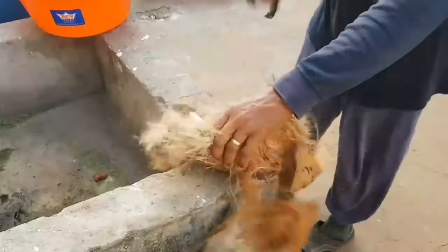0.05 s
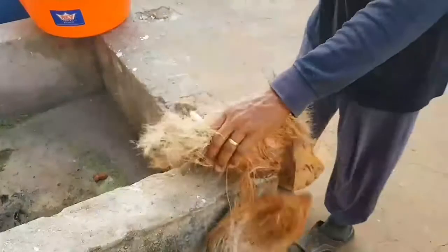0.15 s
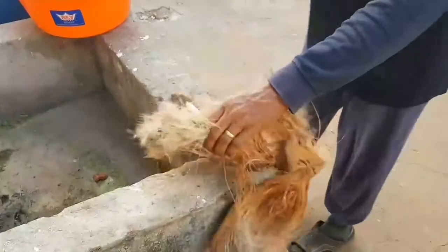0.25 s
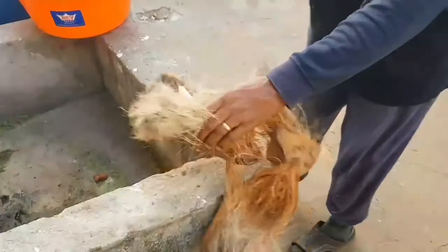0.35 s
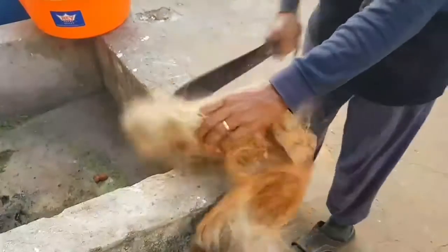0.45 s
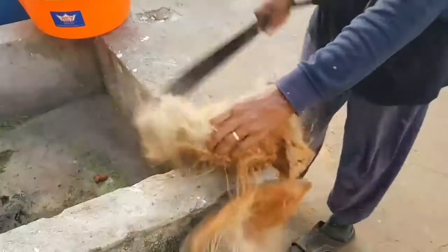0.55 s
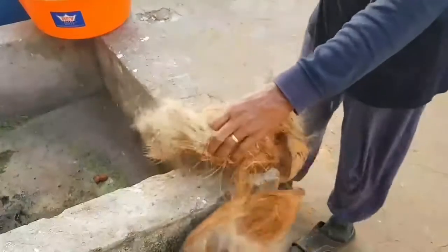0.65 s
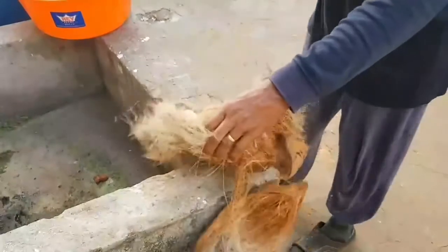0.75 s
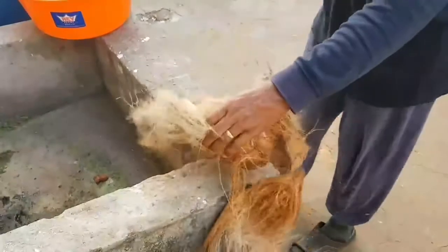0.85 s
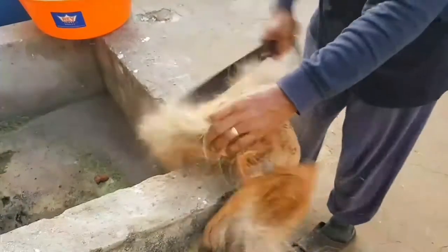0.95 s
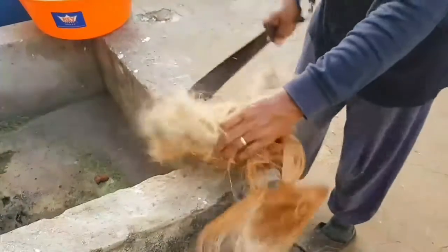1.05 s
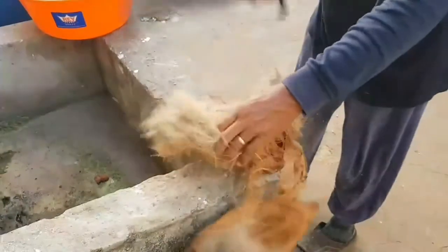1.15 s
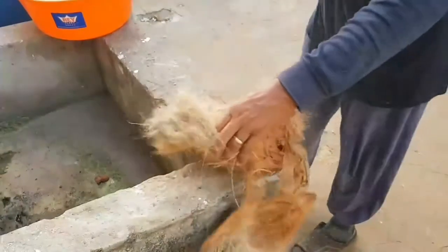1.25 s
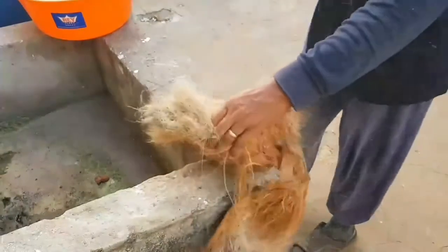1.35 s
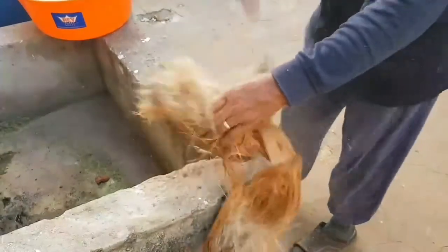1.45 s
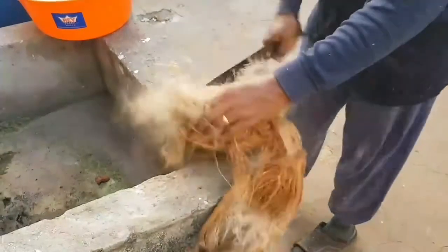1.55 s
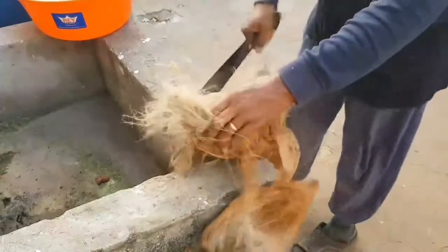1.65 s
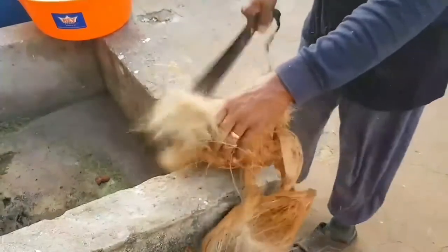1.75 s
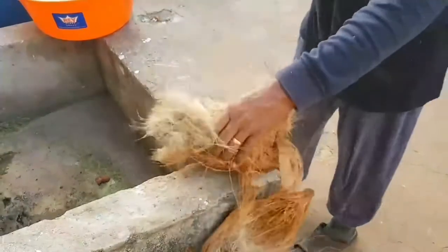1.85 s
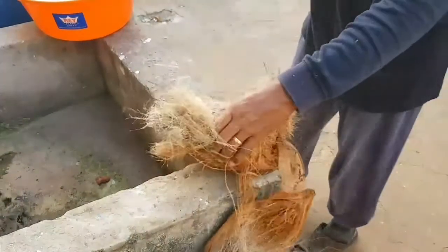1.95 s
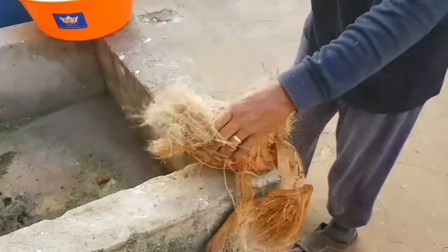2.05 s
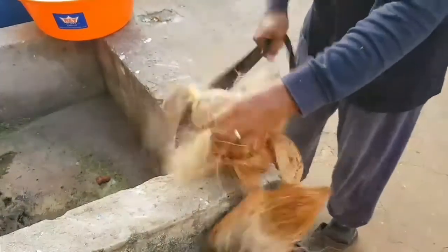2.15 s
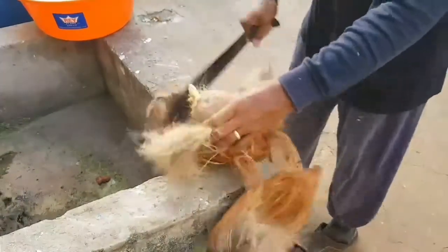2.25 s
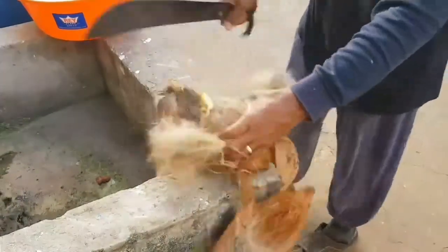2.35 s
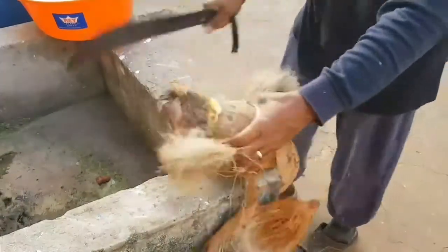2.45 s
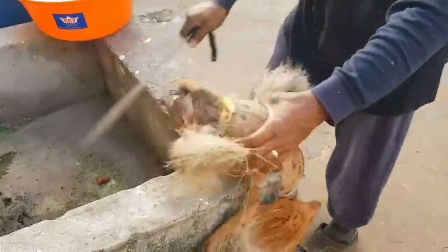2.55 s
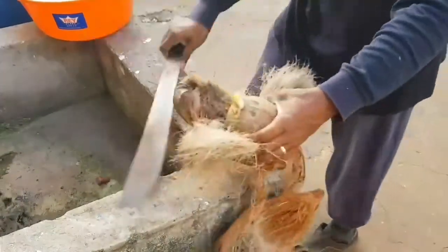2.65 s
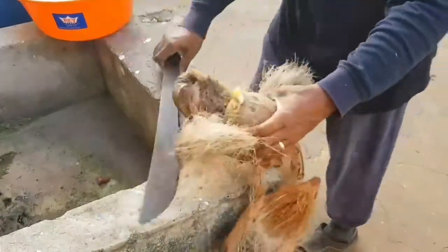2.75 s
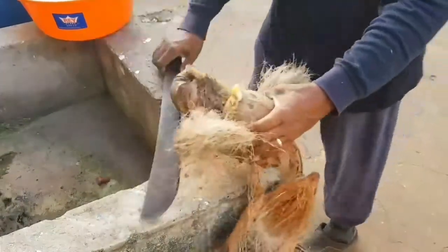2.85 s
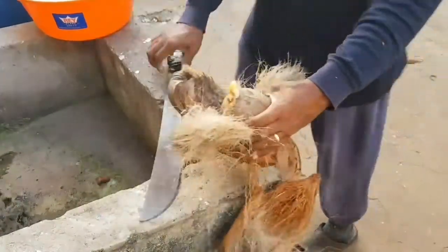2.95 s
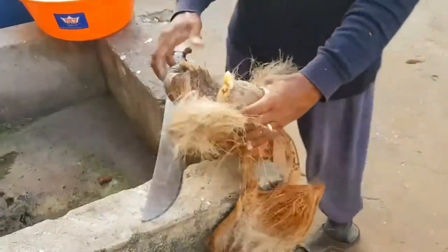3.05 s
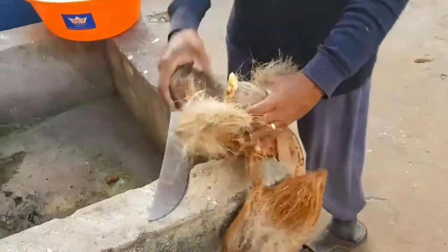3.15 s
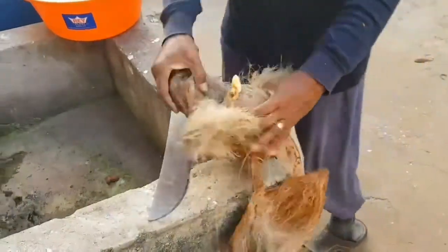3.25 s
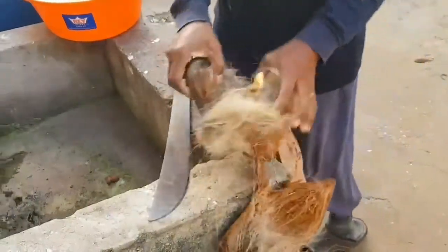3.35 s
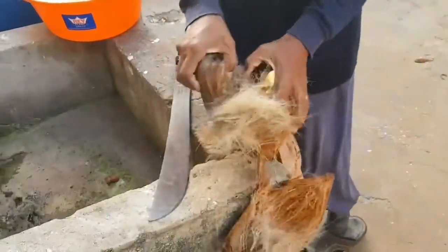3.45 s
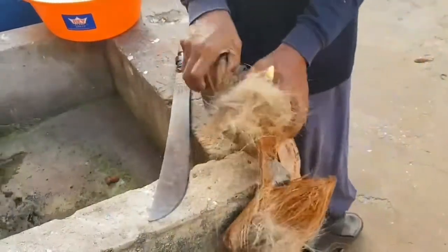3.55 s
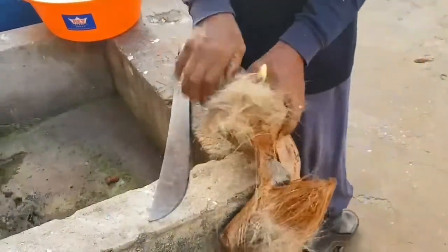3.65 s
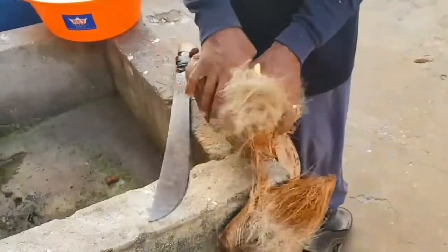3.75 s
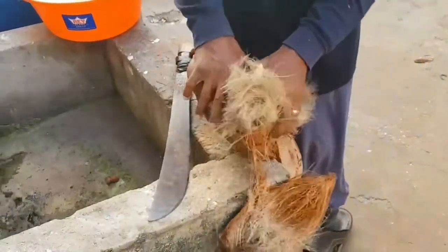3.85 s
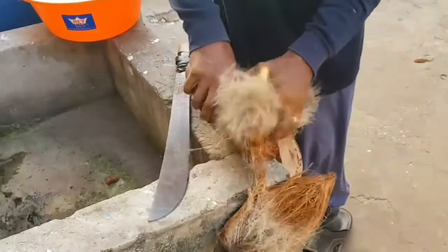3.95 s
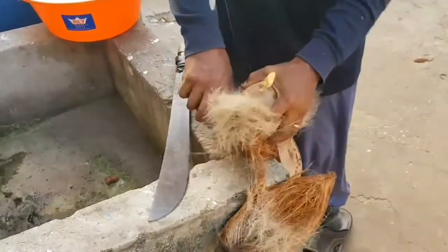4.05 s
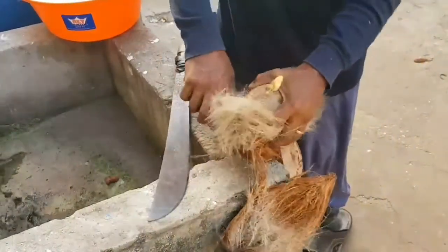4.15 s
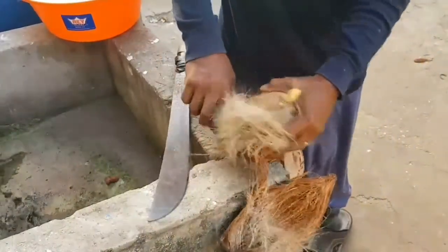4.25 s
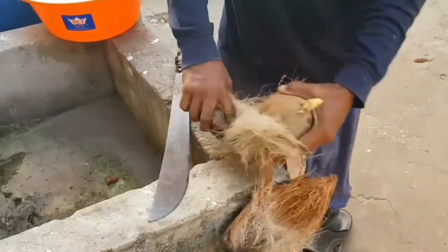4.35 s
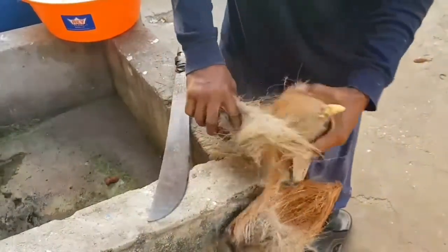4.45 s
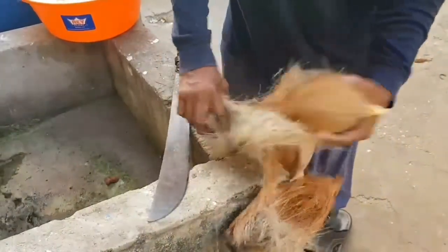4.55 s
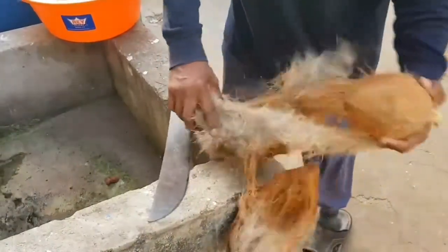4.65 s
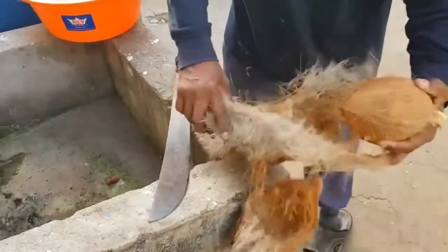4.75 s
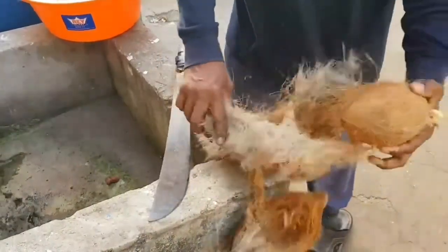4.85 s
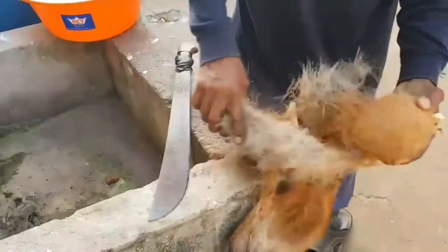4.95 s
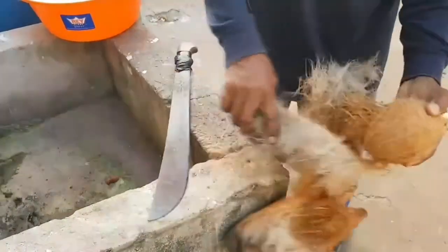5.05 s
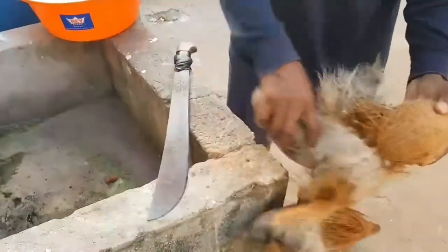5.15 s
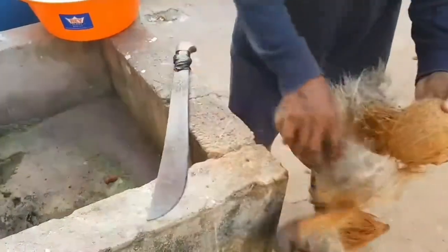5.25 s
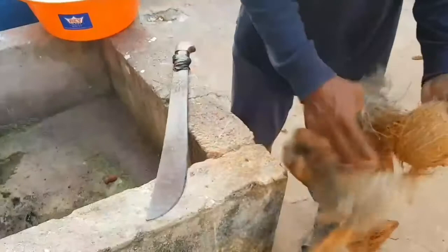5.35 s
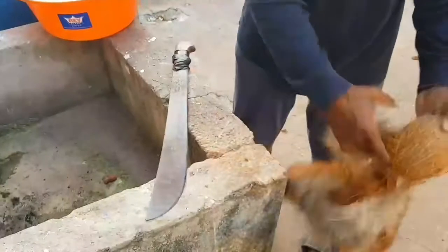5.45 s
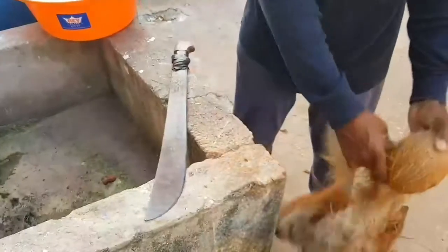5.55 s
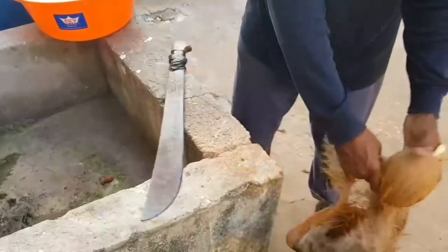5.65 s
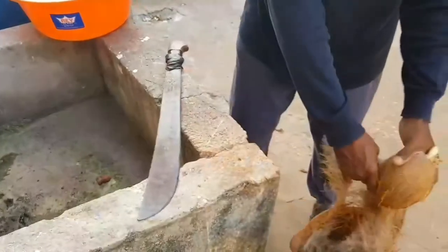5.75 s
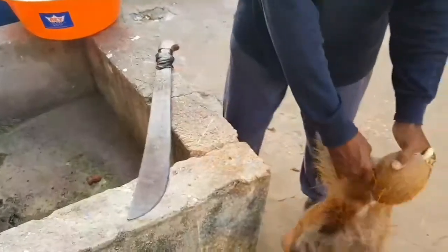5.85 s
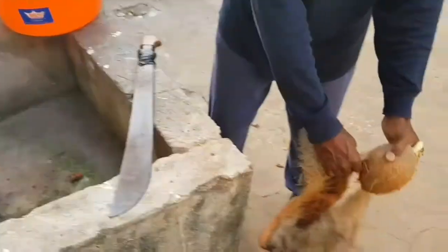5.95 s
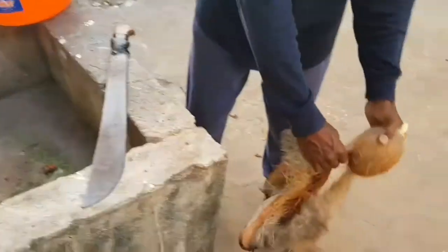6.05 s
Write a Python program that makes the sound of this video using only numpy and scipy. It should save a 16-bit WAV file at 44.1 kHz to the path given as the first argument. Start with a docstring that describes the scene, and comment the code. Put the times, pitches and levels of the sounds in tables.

```python
"""Fibre rustles and a coconut knocks lightly on a concrete kerb, then a machete chops its dry husk
four times. Each blow crushes fibre and sets the hollow nut ringing. The blade is laid down with a
grating clatter, and loose fibre is torn off by hand in crackly pulls while nut and husk knock
against the kerb. A bird rasps and squeals nearby; light wind and a far hum lie under it all."""
import sys
import numpy as np
from scipy import signal
from scipy.fft import rfft, irfft, next_fast_len
from scipy.io import wavfile
from scipy.ndimage import uniform_filter1d, minimum_filter1d

SR = 44100
rng = np.random.default_rng(int(sys.argv[2]) if len(sys.argv) > 2 else 0)


def wav_out(sig):
    """Save sig, one row per channel (or a flat mono array), as 16-bit PCM at SR to the path in sys.argv[1]."""
    wavfile.write(sys.argv[1], SR, np.round(np.clip(np.atleast_2d(sig).T, -1, 1) * 32767).astype(np.int16))


N = 269658

# Machete chops: t/s, wait until the edge wedges/s, focus/(dB per octave), then for bite and wedge each:
# (thud/dB, thud f/Hz, kerb/dB, shell/dB, shell f/Hz, crack/dB, crush time/s, freedom to ring/0-1)
CHOP_HITS = [(0.413, 0.011, 25, (-1.5, 643, -21, -8, 1769.5, -19, .0054, .3),
             (0, 424, -10, -11, 2600, -16, .0076, .22)),
             (0.926, .008, 10, (2.5, 594.5, -11, -10, 1400, -18, .0069, .3),
             (-4, 499.5, -18, -7, 3400, -13, .005, .25)),
             (1.472, .009, 4, (-6, 560, -20, -5, 3080, -12, .006, .3),
             (2, 520, -8, -10, 2019.5, -9.5, .009, .25)),
             (2.123, .013, 20, (-18, 852, -21, -1, 2050, -19, .006, .9),
             (-9.5, 892, -20, -9, 2250, -17.5, .014, .6))]

def chops():
    """Each chop is two quick blows: the edge bites, then wedges in the husk."""
    out = np.zeros((2, N))
    for start, wait, focus_db, *touches in CHOP_HITS:
        for at, touch in zip((start, start + wait), touches):
            thud_db, thud_hz, kerb_db, shell_db, shell_hz, crack_db, crush_s, free = touch
            blow(out, at, thud_db, thud_hz, focus_db, kerb_db, shell_db, crack_db, crush_s, free,
                 shell_hz, first_touch=15.5)
    return out


# Knocks: t/s, thud/dB, thud f/Hz, focus/(dB per octave), kerb/dB, shell/dB, crack/dB, crush time/s,
# freedom to ring/0-1
KERB_KNOCKS = [(0.059, -41, 286, 17, -41, -47, -68.5, .008, .9),
               (0.132, -41, 580, 34, -44, -31, -46, .002, .26),
               (0.217, -44, 646, -2, -48, -58, -49, .005, .4),
               (0.605, -30, 610, 10, -50, -41.5, -44, .005, .12),
               (0.633, -33.5, 830, 8, -51, -52, -26, .002, .7),
               (0.741, -35, 495, 41, -44.5, -55.5, -51, .006, .5),
               (0.81, -40, 369, 15, -46, -77, -75, .006, .9),
               (1.136, -24, 590, 24, -62, -32, -36, .004, .2),
               (1.227, -28, 575, 34, -41.5, -49, -40, .004, .35),
               (1.302, -31, 610, 18, -50, -43.5, -62, .004, .3),
               (1.394, -40, 630, 14, -44, -51, -54, .01, .9),
               (1.627, -26.5, 780, 28, -37, -51, -54, .006, .24),
               (1.669, -47, 245, 24, -58, -58, -56, .005, .34),
               (1.766, -37.5, 662, 14, -62, -40.5, -58.5, .005, .35),
               (2.323, -25.5, 882, 44, -54, -45, -49, .005, .26),
               (2.367, -30, 590, 14, -55, -46, -44, .004, .34),
               (2.445, -41, 567, 18, -50, -51.5, -70, .007, .2),
               (3.171, -38, 930, 13, -45, -43, -58, .01, .4),
               (3.268, -40, 909, 14.5, -60.5, -46.5, -50.5, .015, .6),
               (4.469, -33, 650, 26, -46, -44, -40, .003, .6),
               (4.511, -32, 768, 34.5, -50, -26, -38, .008, .9),
               (4.578, -35, 830, 27, -47, -33, -44, .007, .7),
               (4.766, -57, 624, 26, -56, -40.5, -39.5, .007, .9),
               (4.811, -16.5, 463, 9.5, -23.5, -28, -48, .005, .3),
               (4.948, -14, 570, 60, -54, -14.5, -33, .004, .6),
               (4.981, -33, 536, 14, -65, -42, -35, .005, .5),
               (5.033, -33, 565, 40, -62, -46, -36, .003, .25),
               (5.201, -60, 740, 18, -67, -54, -70, .005, .9),
               (5.346, -13, 850, 14, -52, -24, -39, .008, .2),
               (5.41, -35, 249, 21, -53, -24, -44, .005, .38),
               (5.469, -36, 900, 30, -67, -17, -55, .003, .6),
               (5.567, -38, 590, 45, -60, -47, -43, .006, .5),
               (5.625, -36, 560, 45, -60, -57, -54, .005, .9),
               (6.074, -41, 445, 21.5, -58, -48, -74, .006, .9)]

def knocks():
    """Nut and husk bump the kerb, one blow each time."""
    out = np.zeros((2, N))
    for knock in KERB_KNOCKS:
        blow(out, *knock, shell_hz=2200, first_touch=6.5)
    return out


# The tones that kerb, hollow nut and hard shell ring with: f/Hz, level/dB, free ring time/s
KERB_TONES = [(69.9, -8.5, 0.17), (88.2, -10.5, 0.04), (125, -1, 0.014), (182, 2.5, 0.35), (206.6, 4, 0.3)]
NUT_TONES = [(250, -3.5, 0.35), (286, -9, 0.29), (353, -4, .12), (353.5, 0.5, 0.41), (433.8, 1, 0.39),
             (478.7, -10.5, 0.21), (529.6, -4, 0.097), (574.5, 1, .18), (643.5, -3, 0.3), (735, 1, .08),
             (848, -3, 0.22), (891, -7, 0.057)]
SHELL_TONES = [(1119, -2.5, 0.017), (1343, -1.5, 0.12), (1577, -1, 0.12), (1830, -8, 0.065),
               (1720, 10, 0.025), (1850, 2, 0.026), (2129, 4, 0.033), (2300, 3.5, 0.042), (2625, 4.5, 0.03),
               (2940, -13.5, 0.013), (2940, -0.5, 0.019), (3275, -6.5, 0.072), (3400, 4.5, 0.024),
               (3840, -6.5, 0.05), (3915, -14, 0.036)]
# The sound of splintering husk, low to high: f/Hz, level/dB
CRACK_SPECTRUM = [(710, -49), (1200, -12), (1640, -3), (2190, -6), (2890, -19), (4290, -6.5), (4770, -15),
                  (5850, -12.5), (8880, -16), (15500, -23.5)]

def blow(out, start, thud_db, thud_hz, focus_db, kerb_db, shell_db, crack_db, crush_s, free,
         shell_hz, first_touch):
    """A blow crushes fibre for a moment; kerb, nut and shell ring, with a bright crack on top."""
    push = crush(crush_s, first_touch)
    splinters = crush(1.77 * crush_s, first_touch=2.5)   # fine fibres keep breaking after the push
    kerb = amp(kerb_db) * ring(push, KERB_TONES, 185, focus_db=9.5, free=.47, spread_db=2.7)
    thud = amp(thud_db) * ring(push, NUT_TONES, thud_hz, focus_db, free, spread_db=2.1)
    shell = amp(shell_db) * ring(splinters, SHELL_TONES, shell_hz, min(focus_db, 22), free, spread_db=.91)
    crack = amp(crack_db) * peak_one(colour(splinters, CRACK_SPECTRUM))
    add(out, start, kerb + thud + shell + crack, pan_db=1.6 * rng.standard_normal())


def crush(decay_s, first_touch):
    """A first touch, then a run of tiny contacts that swells at once and dies away."""
    t = np.arange(SR // 6) / SR
    contacts = unit(clicks(len(t), per_s=6000, spread_db=1.7))
    push = contacts * np.exp(-t / np.clip(decay_s, .001, .03)) * np.minimum(t / .0016, 1)
    push[0] += first_touch
    return push


def ring(push, tones, centre_hz, focus_db, free, spread_db):
    """A push rings an object's tones; the grip detunes them and, with `free` below 1, cuts them short."""
    hz, db, ring_s = np.transpose(tones)[:, :, None]
    t = np.arange(len(push)) / SR
    hz = hz * (1 + .016 * rng.standard_normal(hz.shape))
    octaves_away = np.abs(np.log2(hz / centre_hz))
    db = db + spread_db * rng.standard_normal(hz.shape) - focus_db * octaves_away
    fade_db = 60 * t / (ring_s * np.clip(free, .1, 1.5))
    ringing = amp(db - fade_db) * np.sin(2 * np.pi * hz * t)
    return peak_one(-signal.fftconvolve(push, ringing.sum(0))[:len(t)])


# The blade touches the concrete: t/s, scrape/dB, ring/dB
BLADE_TOUCHES = [(2.7501, -27.5, -42.5), (2.7642, -34.5, -41), (2.805, -40.5, -41.5), (2.847, -47.5, -48),
                 (2.8862, -47, -41), (2.8946, -47, -34.5), (2.915, -34, -44), (2.9332, -25, -36),
                 (2.9379, -15.5, -29.5), (2.9536, -22.5, -33.5), (3.009, -40, -34.5)]
# The steel's tones: f/Hz, level/dB, free ring time/s
BLADE_TONES = [(2280, 1.5, 0.092), (2580, 2, 0.038), (3190, 2.5, 0.075), (3890, -0.5, 0.14), (4550, -6, .1),
               (4214, -10, 0.074), (5580, -2.5, 0.11), (6500, -1.5, .08), (7530, -4, 0.055),
               (9400, -6, 0.071), (10110, -6, 0.041), (12600, -5, 0.049)]
# The sound of steel scraping: f/Hz, level/dB
SCRAPE_SPECTRUM = [(530, -40), (900, -27), (1710, -6.5), (2150, -12), (2660, -11), (3220, 0), (7960, -6.5),
                   (10200, 0), (15500, -13.5)]

def blade_laid_down():
    """The steel rocks on the concrete, grating and ringing a little at each touch."""
    out = np.zeros((2, N))
    for start, scrape_db, ring_db in BLADE_TOUCHES:
        push = crush(decay_s=.015, first_touch=5.3)
        steel = ring(push, BLADE_TONES, centre_hz=4120, focus_db=11.5, free=.4, spread_db=.77)
        scrape = peak_one(colour(push, SCRAPE_SPECTRUM))
        add(out, start, amp(ring_db) * steel + amp(scrape_db) * scrape)
    return out


# Loose fibre is pulled and rubbed: loudest t/s, swell/s, fade/s, middle/dB, treble/dB, low/dB
FIBRE_PULLS = [(0.0, .1, 0.54, -51.5, -59, -45.5), (0.395, .03, .03, -50, -56, -48),
               (1.46, .012, 0.0233, -33.5, -38, -35.5), (1.741, 0.6, 0.03, -63.5, -59.5, -61.5),
               (2.42, .1, -0.14, -69.5, -65, -61.5), (2.91, 0.05, 0.19, -51.5, -73, -56),
               (3.271, 0.57, -0.04, -65, -65.5, -58), (3.53, 0.18, 0.8, -61.5, -64, -63.5),
               (3.995, .11, .06, -44, -43.5, -47), (4.108, .008, .18, -54, -51, -57.5),
               (4.27, .14, .05, -47, -48.5, -50.5), (4.44, .08, 0.03, -45, -46, -48),
               (4.515, .05, .05, -42, -46, -40), (4.601, .1, 0.0754, -40, -41.5, -41),
               (4.72, .1, .15, -58, -59, -66), (4.85, 0, .12, -50, -56, -50),
               (5.0, 0.105, 0.08, -47.5, -51.5, -46), (5.28, .14, .25, -46, -51.5, -54.5),
               (5.54, 0.38, 0.15, -50, -56, -51.5), (5.68, 0.2, .1, -63, -65, -57.5),
               (5.85, .25, .25, -52, -54, -64), (6.05, .25, .6, -46, -49, -53)]
# Stiff fibres rip: loudest t/s, swell/s, fade/s, level/dB
FIBRE_RIPS = [(4.0, .1, .06, -46), (4.11, .008, .25, -51), (4.265, .14, .05, -41.5), (4.44, .08, .08, -44),
              (4.6, .08, .05, -44)]
# The sound of loose fibre rustling and of stiff fibre rasping: f/Hz, level/dB
RUSTLE_SPECTRUM = [(150, -10.5), (420, -8), (630, -3.5), (900, -11.5), (1300, -10.5), (1600, -6),
                   (1900, -7.5), (2300, -4.5), (2900, -8), (3500, -10), (4100, -12), (4800, -17.5),
                   (9500, -23.5), (15500, -26.5)]
RASP_SPECTRUM = [(1300, -30), (1650, -14), (1900, 0), (2200, -6), (2450, -4), (2800, -12), (3300, -5),
                 (4300, -5), (4800, -24), (8000, -40)]

def tearing_fibre():
    """Fibres snap in clumps over a finer rub; they are brushed before each chop and settle after it."""
    settling = [(start + .077, .03, .14, -45, -55.5, -42) for start, *_ in CHOP_HITS]   # as FIBRE_PULLS
    brushing = [(start, .018, .01, -52, -58, -52) for start, *_ in CHOP_HITS]
    snaps = unit(clicks(N, per_s=2500 * amp(6 * drift(30)), spread_db=4))
    rub = snaps + .58 * rng.standard_normal((2, N))
    fibre = colour(rub, RUSTLE_SPECTRUM)
    bands = [signal.sosfilt(signal.butter(3, edges_hz, "band", fs=SR, output="sos"), fibre)
             for edges_hz in ([1200, 5000], [5000, 17000], [200, 1200])]   # middle, treble, low
    gains = swells(FIBRE_PULLS + settling + brushing)
    rustle = sum(gain * unit(band) for gain, band in zip(gains, bands))
    rasp = swells(FIBRE_RIPS) * unit(colour(rub, RASP_SPECTRUM))
    return rustle + rasp


def swells(rows):
    """Loudness curves that rise 20 dB per swell time and fall 20 dB per fade time (each at least .01 s)."""
    t, gains = np.arange(N) / SR, 0
    for peak_s, swell_s, fade_s, *db in rows:
        before = (peak_s - t) / max(swell_s, .01)
        after = (t - peak_s) / max(fade_s, .01)
        gains = gains + amp(db)[:, None] * amp(-20 * np.maximum(before, after))
    return gains


# A rising rasp, a falling squeal and two faint chirps, one list each:
# t/s, f/Hz, level/dB, pitch tremble/Hz (capped at 110), overtones/dB
BIRD_CALLS = [
    [(1.34, 1796, -72.5, 59.4, 6.5), (1.365, 1946, -54.5, 90, -2), (1.39, 2094, -52, 200, 5),
     (1.42, 2150, -54, 200, 2), (1.46, 2130, -57.5, 150, -3)],
    [(1.41, 2710, -59, 94, -15), (1.43, 3053, -49, 119, -27), (1.47, 3150, -33.5, 120, 1),
     (1.56, 2826, -49, 119, -11), (1.62, 2550, -45, 121, -18), (1.66, 2327, -48.5, 89, -22),
     (1.72, 2250, -43, 120.4, -15.5), (1.76, 2140, -50.5, 119, -23), (1.8, 2180, -65, 81.6, -21),
     (1.88, 2145, -68, 79.7, -17)],
    [(4.69, 2600, -70, 61, -23), (4.71, 2800, -54.5, 60, -22), (4.74, 3020, -68.5, 60, -13)],
    [(5.195, 3100, -61, 82, -21), (5.205, 2790, -46.5, 80, -24.5), (5.225, 2320, -71, 80, -21)],
]

def bird():
    """A whistle with two overtones, hoarse because its pitch and loudness tremble fast."""
    out, t = 0, np.arange(N) / SR
    for call in BIRD_CALLS:
        hz, db, tremble_hz, overtone_db = in_time(call)
        pitch_hz = hz + np.minimum(tremble_hz, 110) * drift(160)
        phase = 2 * np.pi * np.cumsum(pitch_hz) / SR
        voice = np.sin(phase) + amp(overtone_db) * (np.sin(2 * phase) + .4 * np.sin(3 * phase))
        calling = (t > call[0][0]) & (t < call[-1][0])
        out = out + voice * amp(db + 3.7 * drift(150)) * calling
    return out * amp([[1.5], [-1.5]])   # a little to the left


# How long the yard's echoes last: f/Hz, time to fade 60 dB/s
ECHO_TIMES = [(100, .35), (450, 0.29), (1500, 0.16), (4000, 0.18), (12000, 0.17)]
# How strong they are: f/Hz, level/dB, share common to left and right/0-1
ECHO_MIX = [(100, -18.5, 0.96), (500, -16, 0.94), (1510, -20.5, 0.32), (5000, -17, 0.056),
            (14970, -15, .05)]
# How far the direct sound on the left runs ahead of the right: f/Hz, phase/radians
LEFT_LEAD = [(100, 0.05), (500, 0.057), (1200, 0.99), (1600, 2.46), (2200, 7.94), (3000, 7.64),
             (4500, 8.02), (8000, 8.14), (16000, 7.43)]

def yard(sound):
    """Near sounds reach left and right out of step; kerb and walls add echoes, alike only in the bass."""
    size = next_fast_len(N + SR)
    radians_per_sample = 2 * np.pi * np.arange(size // 2 + 1) / size
    fade_s = np.maximum(at_hz(ECHO_TIMES, size), .05)
    echoes = np.zeros((2, len(fade_s)), complex)
    for k, lag in enumerate((rng.uniform(.007, .034, 16) * SR).astype(int)):
        bounce = amp(-60 * lag / SR / fade_s) * np.exp(-1j * radians_per_sample * lag)
        echoes[k % 2] += (-1) ** (k // 2) * bounce / (1 - bounce)   # a bounce and all its repeats
    level = amp(at_hz([row[:2] for row in ECHO_MIX], size))
    common = np.clip(at_hz([row[::2] for row in ECHO_MIX], size), 0, 1)
    echoes = level * (common * echoes[::-1] + echoes) / np.sqrt(1 + common ** 2)
    direct = np.array([np.ones_like(level), np.exp(-1j * at_hz(LEFT_LEAD, size))])
    return irfft(rfft(sound, size) * (direct + echoes), size)[:, :N]


# The wind rises and falls: t/s, level/dB
WIND_LEVELS = [(0.0, -51), (0.85, -55), (0.98, -50), (1.55, -51), (1.84, -66), (2.01, -65), (2.25, -57),
               (2.5, -59.5), (2.89, -68.5), (3.35, -62), (3.95, -61.5), (4.46, -56), (4.63, -62),
               (5.36, -60.5), (5.43, -56.5), (6.11, -51)]
# Its low rumble: f/Hz, level/dB
WIND_SPECTRUM = [(12, -31.5), (20, -6.5), (64, 2.5), (139, -8), (182, -24.5), (265, -18), (300, -20),
                 (390, -60.5), (660, -120)]

def wind():
    """Light wind buffets left and right with an uneven rumble."""
    rumble = stereo_noise(WIND_SPECTRUM, width=1.9)
    return rumble * amp(in_time(WIND_LEVELS)[0] + 1.513 * drift(2.3))


# Distant noise: f/Hz, level/dB
HUM_SPECTRUM = [(59, -12.5), (100, 3), (313, -8), (497, -14.5), (627, -7), (758, -15.5), (1060, -19.5),
                (2180, -18), (2930, -21.5), (3930, -21.5), (15500, -32)]

def far_hum():
    """Faint, steady noise from far away, strongest in the bass."""
    return amp(-62) * stereo_noise(HUM_SPECTRUM, width=1.2)


def stereo_noise(spectrum, width):
    """Noise shared by both sides, plus `width` times as much of each side's own."""
    shared, *own = rng.standard_normal((3, N))
    return unit(colour(shared + width * np.array(own), spectrum))


def colour(x, spectrum):
    """Give a sound the bass and treble in a table, with no ringing ahead of it (minimum phase)."""
    cepstrum = irfft(np.log(amp(at_hz(spectrum, 2048))))
    cepstrum[1:1024] *= 2   # fold the half before time zero onto the half after it
    cepstrum[1025:] = 0
    taps = irfft(np.exp(rfft(cepstrum)))
    taps = taps.reshape((1,) * (x.ndim - 1) + (-1,))
    return signal.fftconvolve(x, taps, axes=-1)[..., :x.shape[-1]]


def clicks(count, per_s, spread_db):
    """Random clicks of uneven size and sign."""
    sizes = amp(spread_db * np.minimum(rng.exponential(1, count), 5))
    return sizes * rng.choice([-1, 1], count) * (rng.random(count) < per_s / SR)


def drift(rate_hz):
    """A smooth random wobble of typical size 1."""
    pole = np.exp(-2 * np.pi * rate_hz / SR)
    return unit(signal.lfilter([1], [1, -2 * pole, pole * pole], rng.standard_normal(N + SR))[SR:])


def in_time(rows):
    """Join a table's points over time: one curve per column."""
    times, *columns = np.transpose(rows)
    return [np.interp(np.arange(N) / SR, times, column) for column in columns]


def at_hz(points, size):
    """Join a table's points over frequency, for an FFT of this size."""
    hz, value = np.transpose(points)
    grid_hz = np.maximum(np.arange(size // 2 + 1) * SR / size, 1)
    return np.interp(np.log(grid_hz), np.log(hz), value)


def add(out, start_s, sound, pan_db=0):
    """Mix a sound in; a positive pan moves it left."""
    i = round(start_s * SR)
    out[:, i:i + len(sound)] += sound[:N - i] * amp([[pan_db / 2], [-pan_db / 2]])


def amp(db):
    """Decibels to gain."""
    return 10 ** (np.asarray(db) / 20)


def unit(x):
    """Scale to an average strength (rms) of 1."""
    return x / np.sqrt(np.mean(x ** 2) + 1e-20)


def peak_one(x):
    """Scale to peak 1."""
    return x / (np.abs(x).max() + 1e-12)


def scene():
    """Near sounds echo in the yard, over wind and hum."""
    bass_cut = signal.butter(3, 95, "high", fs=SR, output="sos")
    blows = signal.sosfilt(bass_cut, chops() + knocks())
    return yard(blows + blade_laid_down() + tearing_fibre() + bird()) + wind() + far_hum()


def record(dry):
    """A limiter turns loud blows down and lets go slowly; the highest treble is cut."""
    ceiling, release_db_per_s, cutoff_hz = .93, 57.3, 16536
    over_db = np.maximum(20 * np.log10(np.abs(dry).max(0) / ceiling + 1e-9), 0)
    release_db = release_db_per_s * np.arange(N) / SR
    held_db = np.maximum.accumulate(over_db + release_db) - release_db
    held_db = uniform_filter1d(-minimum_filter1d(-held_db, size=89), size=89)   # eases in before the blow
    treble_cut = signal.cheby2(12, 60, cutoff_hz, fs=SR, output="sos")
    return signal.sosfilt(treble_cut, dry * amp(-held_db))


dry = scene()
out = record(dry)
wav_out(out)
```